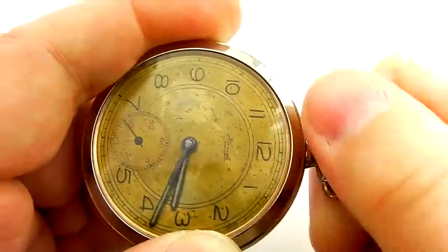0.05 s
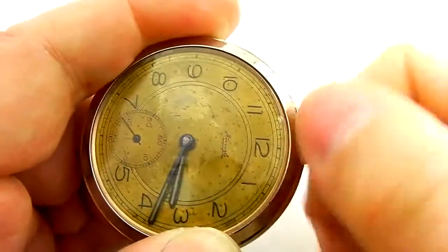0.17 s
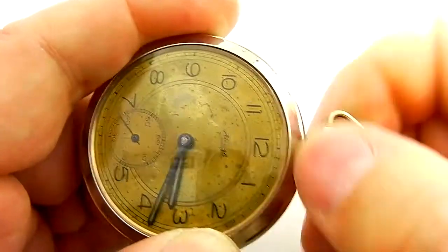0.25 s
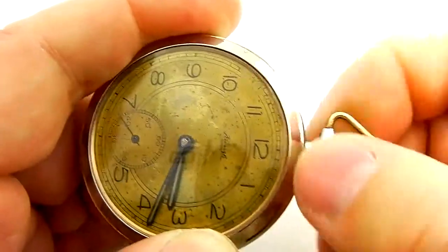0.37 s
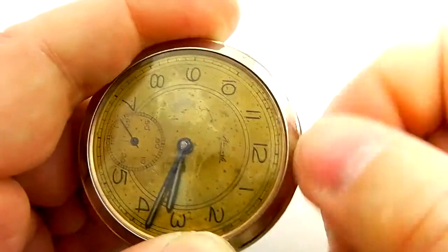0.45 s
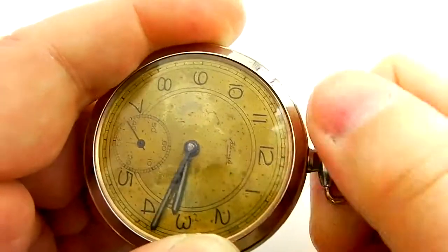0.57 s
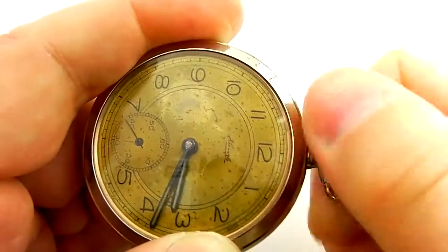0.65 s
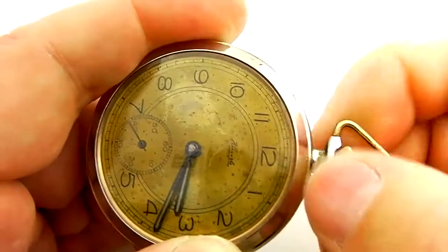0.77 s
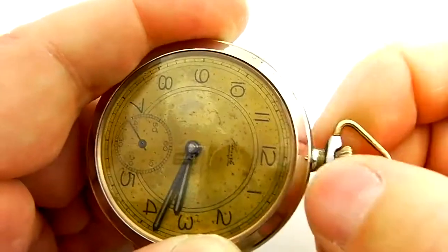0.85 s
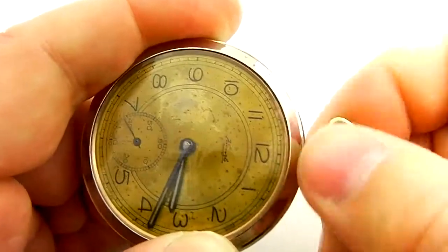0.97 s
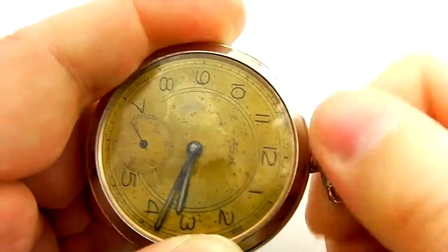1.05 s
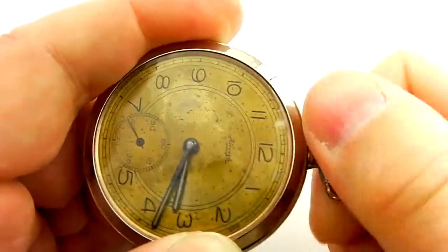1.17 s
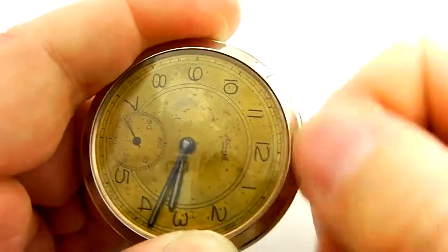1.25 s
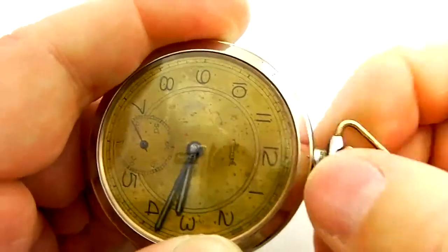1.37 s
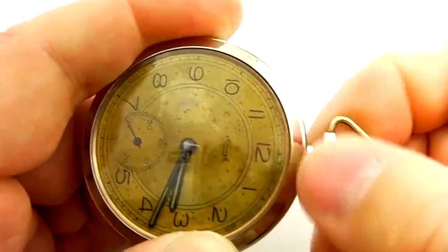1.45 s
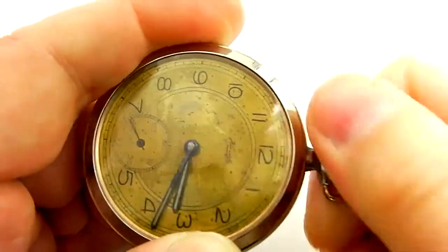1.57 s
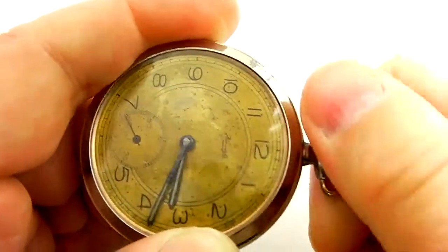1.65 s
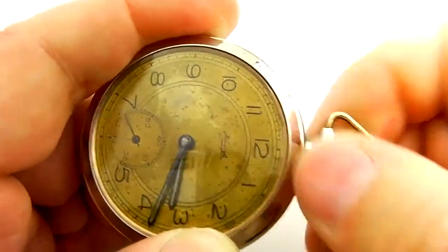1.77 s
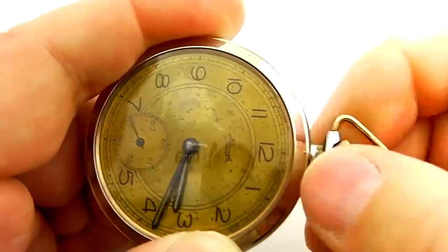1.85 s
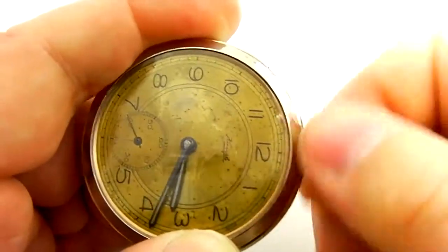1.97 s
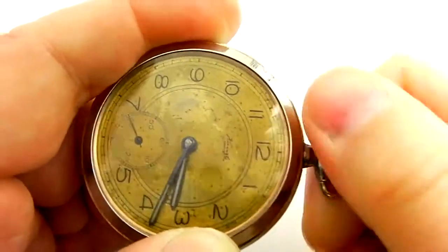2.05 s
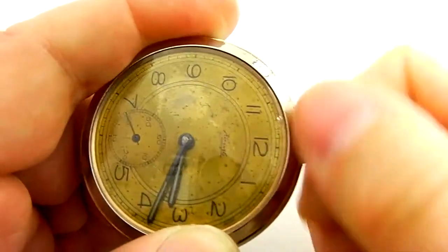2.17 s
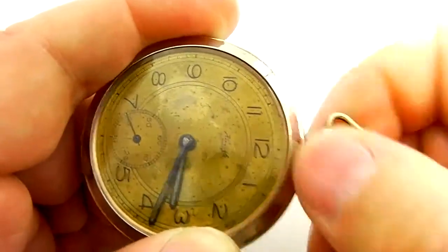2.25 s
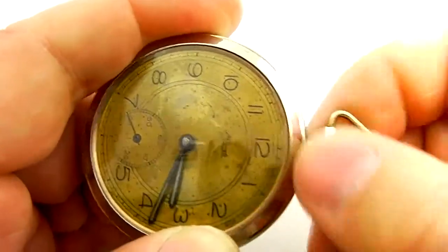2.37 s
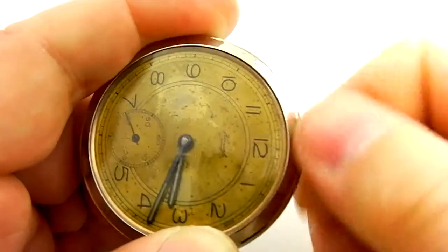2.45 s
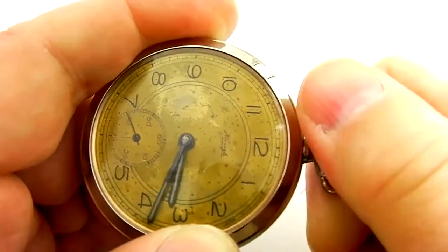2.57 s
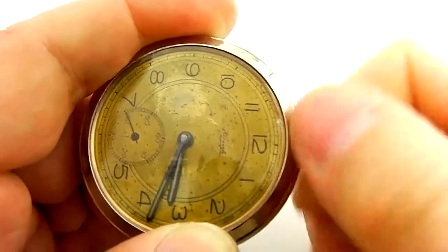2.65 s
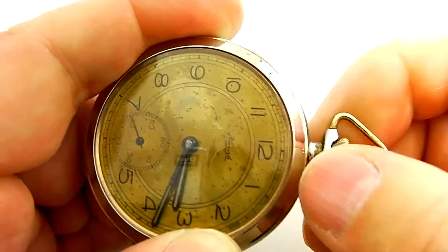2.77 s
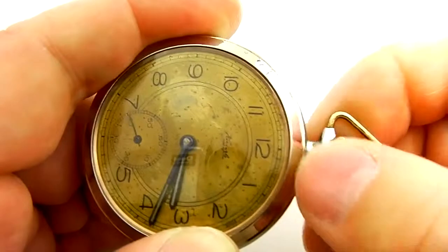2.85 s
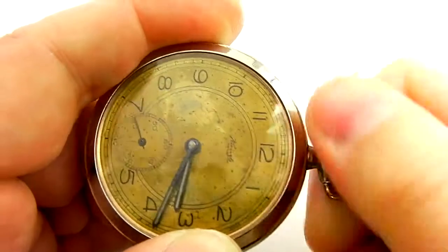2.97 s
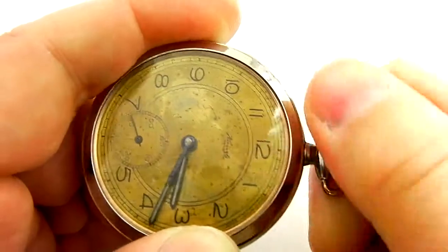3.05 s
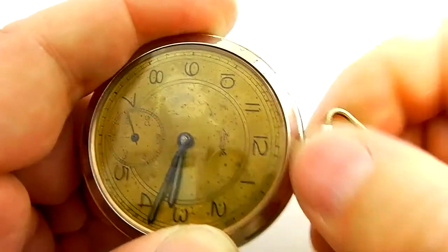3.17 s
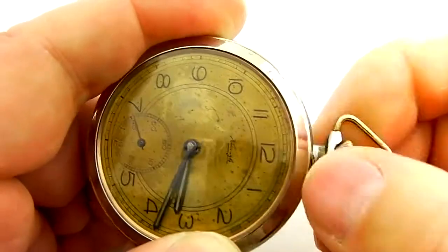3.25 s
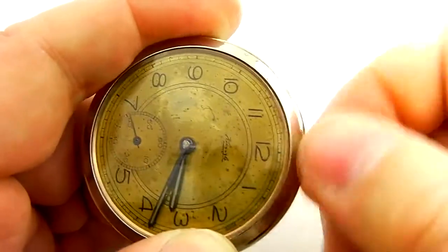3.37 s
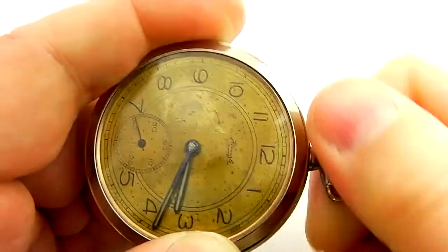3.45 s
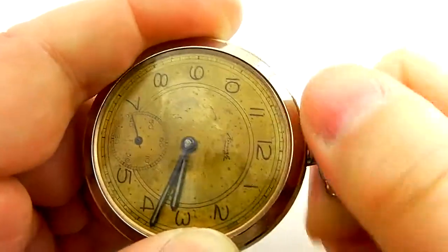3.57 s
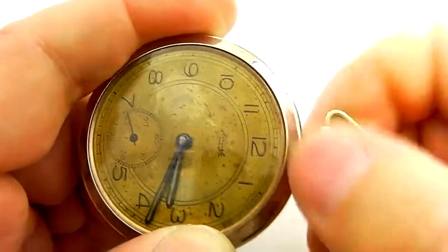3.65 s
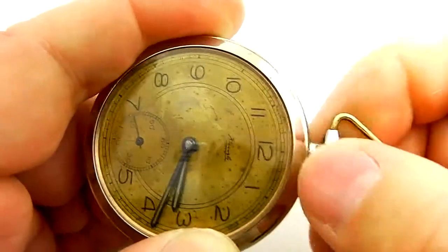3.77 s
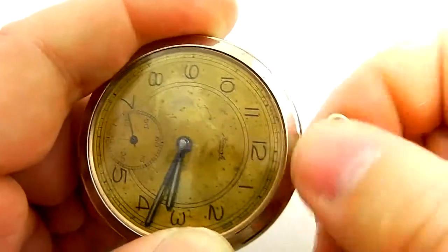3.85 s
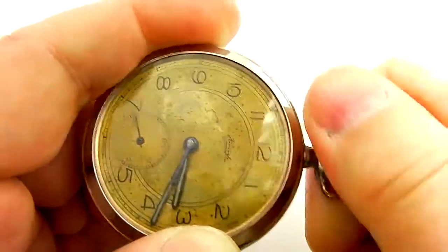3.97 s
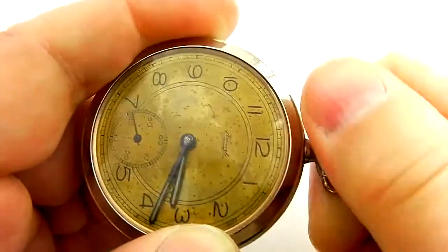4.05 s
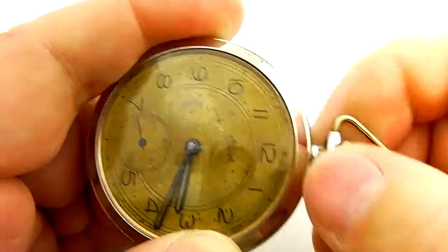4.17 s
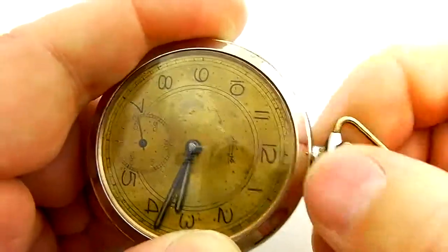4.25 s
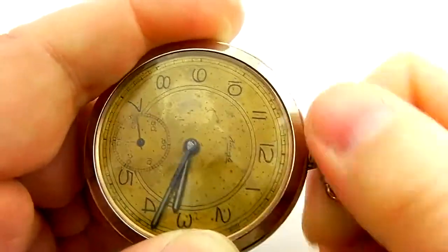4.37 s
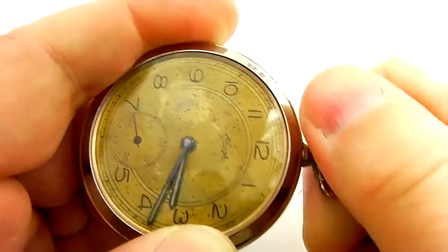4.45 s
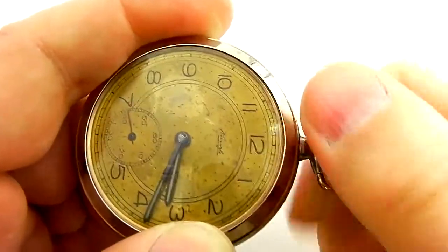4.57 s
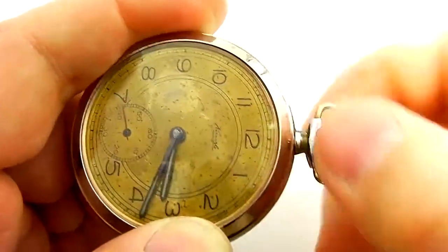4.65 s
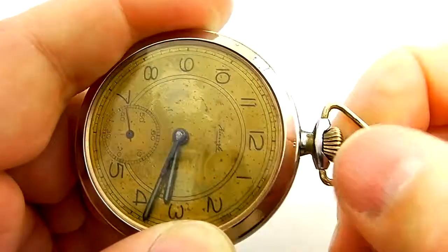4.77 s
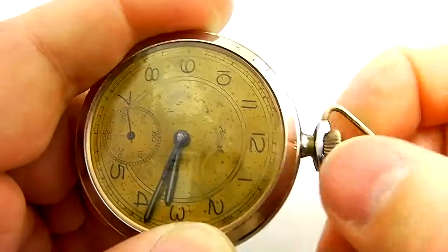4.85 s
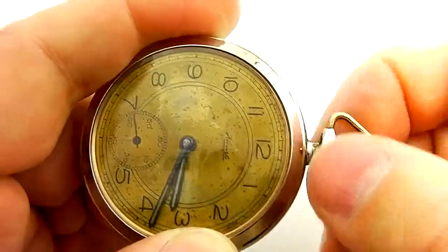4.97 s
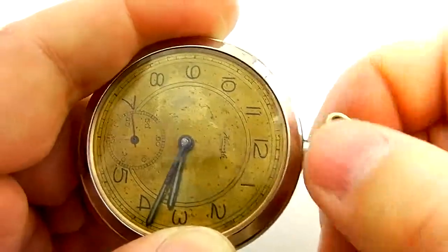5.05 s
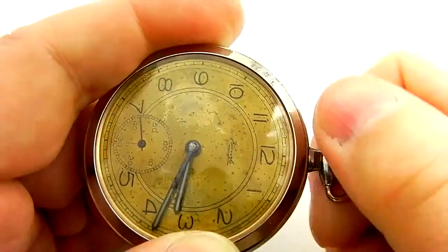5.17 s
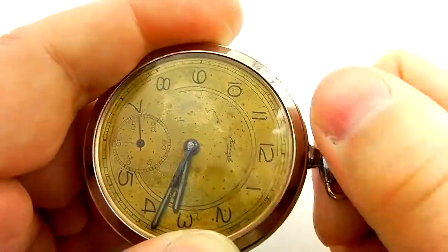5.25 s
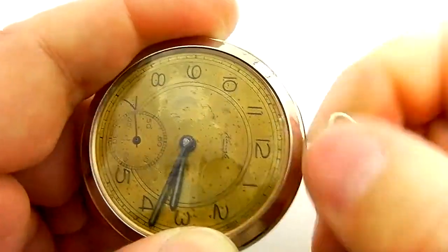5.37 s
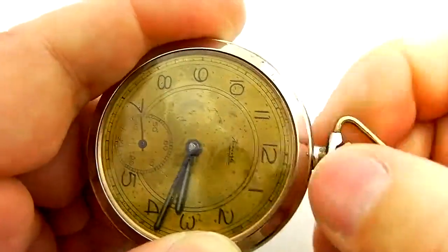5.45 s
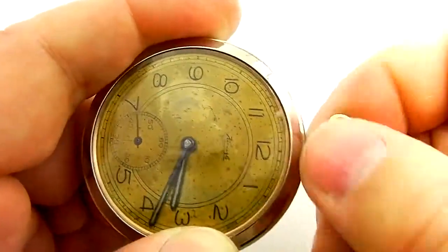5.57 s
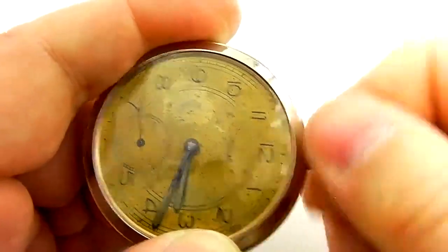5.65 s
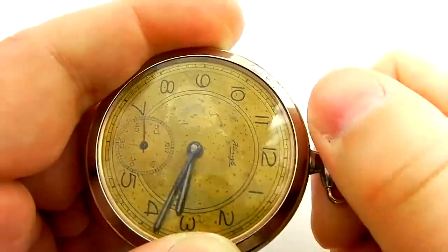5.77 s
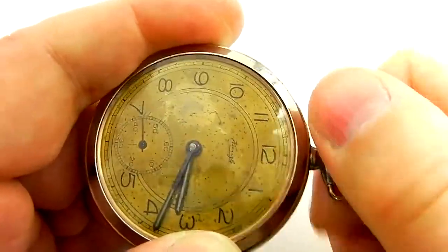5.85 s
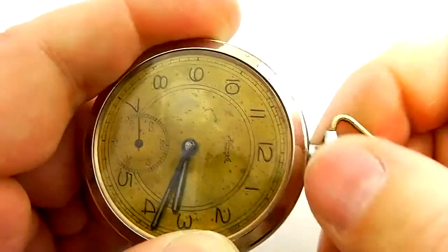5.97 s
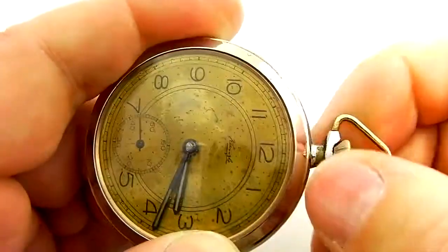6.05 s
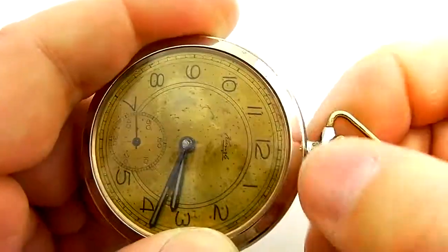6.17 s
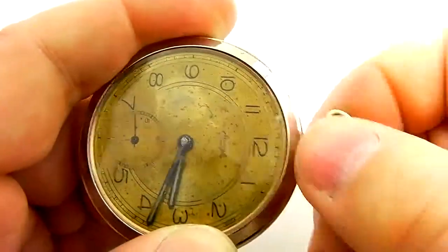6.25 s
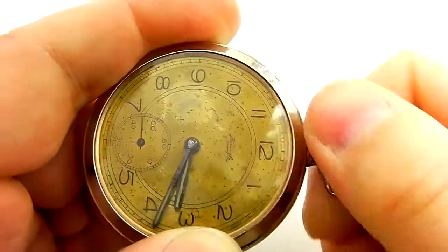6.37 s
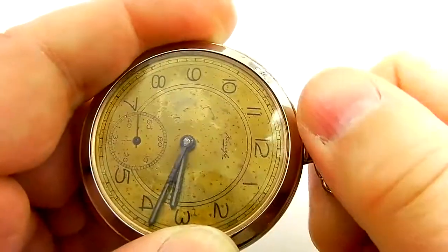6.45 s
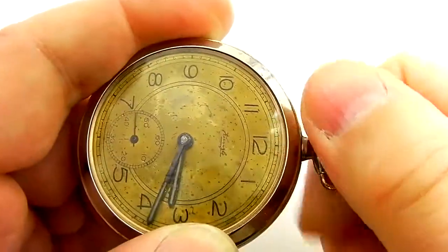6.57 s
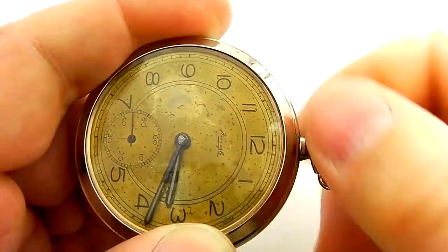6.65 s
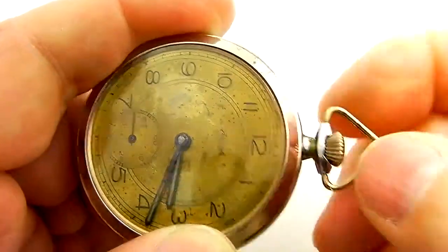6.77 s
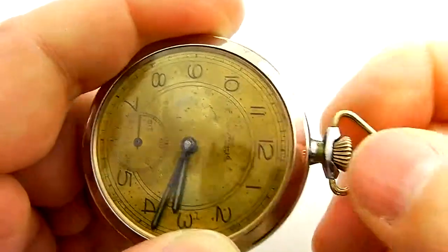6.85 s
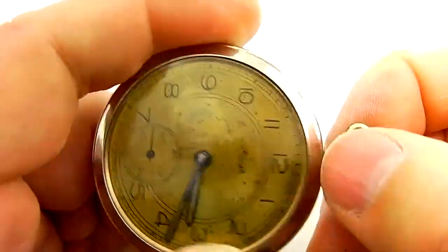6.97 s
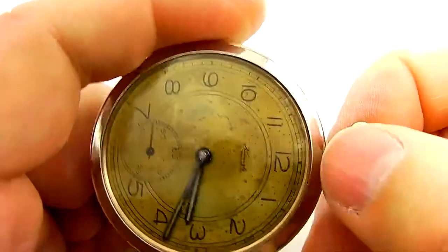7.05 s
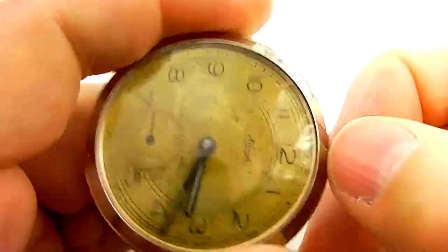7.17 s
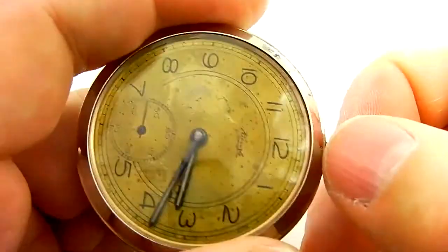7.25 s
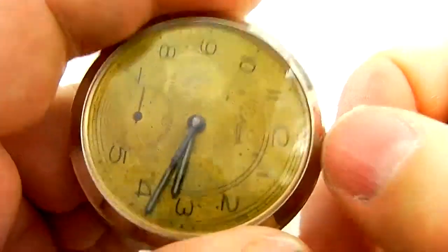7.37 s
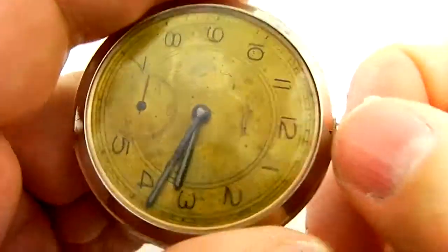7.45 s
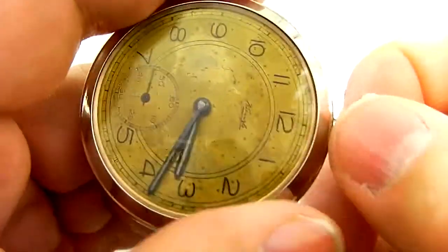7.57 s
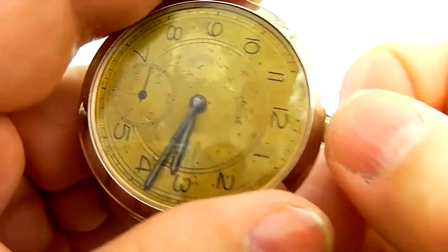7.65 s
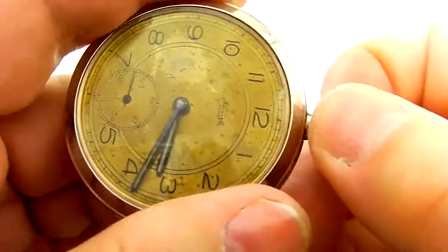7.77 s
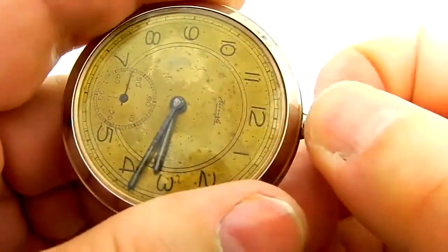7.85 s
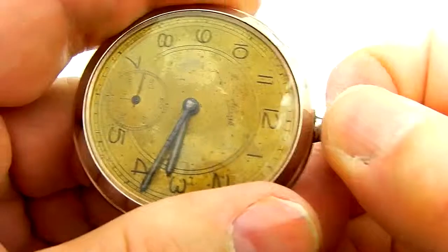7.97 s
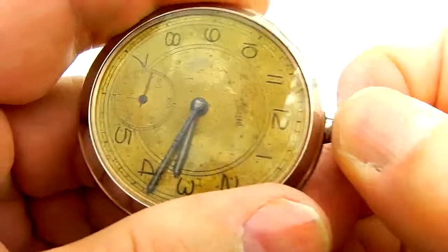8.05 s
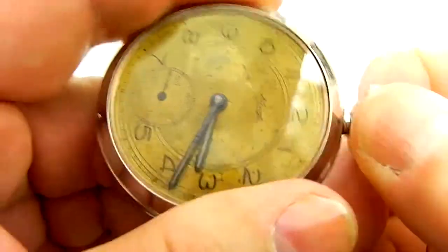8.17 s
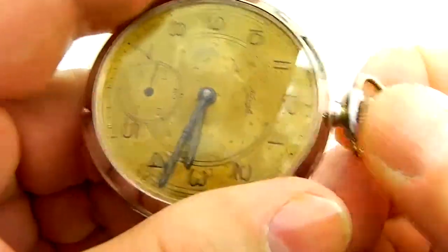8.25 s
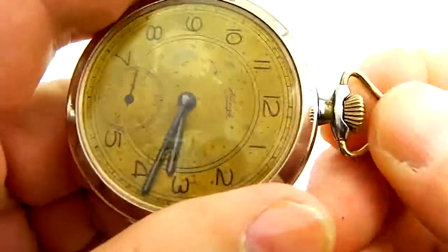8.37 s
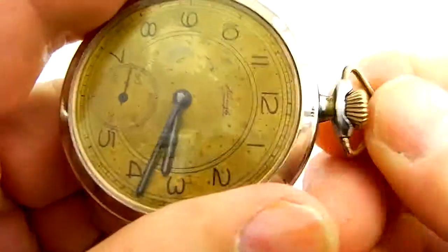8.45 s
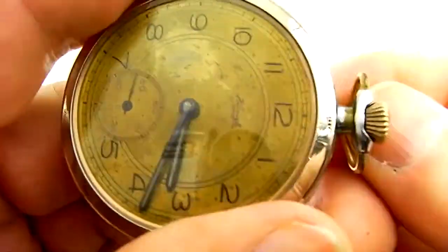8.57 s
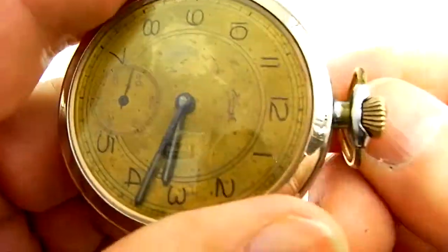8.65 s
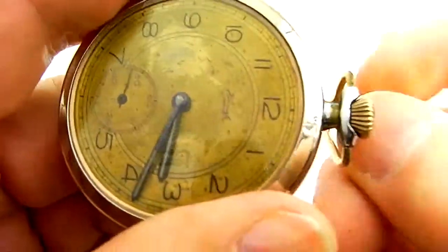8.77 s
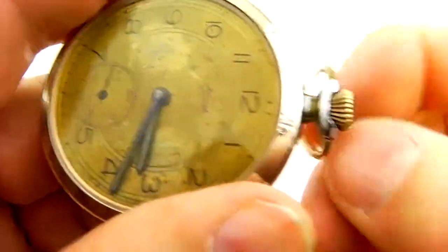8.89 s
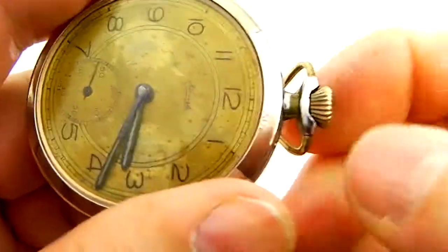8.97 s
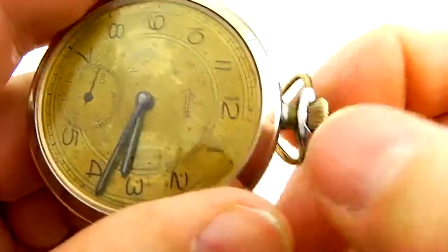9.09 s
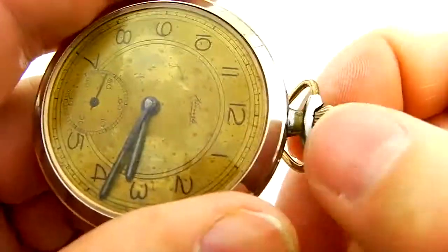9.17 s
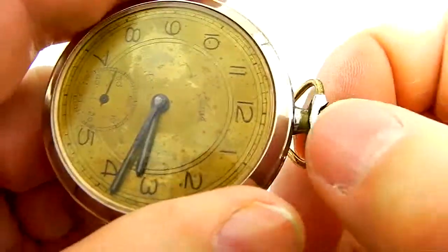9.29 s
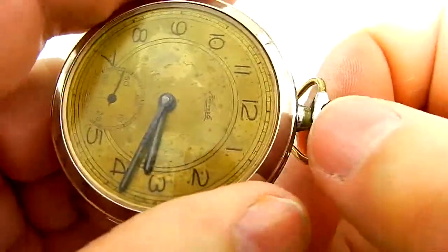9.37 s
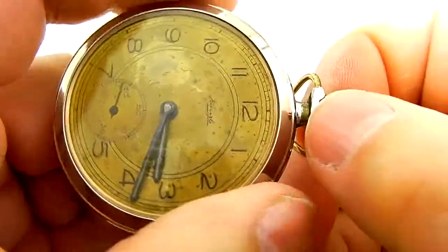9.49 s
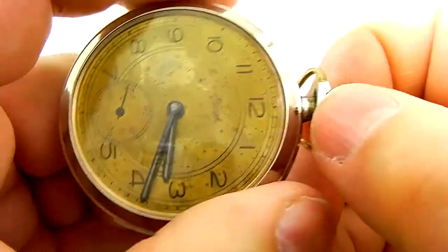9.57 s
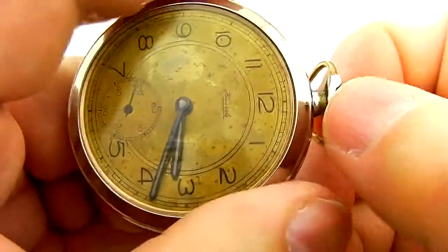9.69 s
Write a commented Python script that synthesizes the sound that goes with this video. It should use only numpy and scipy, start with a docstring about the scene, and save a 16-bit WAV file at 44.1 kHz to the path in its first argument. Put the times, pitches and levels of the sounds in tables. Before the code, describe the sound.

A pocket watch is wound by hand, very close to the microphone in a quiet, nearly dry room. From 0.1 to 4.5 seconds short ratchet bursts come about four a second, each usually three to eight bright, gritty steel clicks packed into under a tenth of a second, forth and back twists differing slightly in colour. Faint skin rubs and light crown knocks fill the gaps. A sharper clack falls at 4.7, then a pause until 5.2; spaced bursts follow until about 6.5. A hard, ringing knock at 6.7 ends the winding. Around 7.1 to 7.3 the hands rumble, bump dully and scuff the rim with a nail. Afterwards there is soft hollow creaking, a small rub and knock near 9, and delicate high ticking, five a second with alternate ticks weaker, present throughout but clearer after 8 as hiss and a thin whine rise.

```python
"""A pocket-watch ratchet: a thumb twists the crown to and fro, close to the microphone in a quiet room.
Each twist drags a spring over a few teeth; every tooth that drops is a noisy contact ringing case and works.
Around the twists the fingers rub and the crown knocks; filtered friction and contact noise make both.
The escapement ticks faintly five times a second, as short bursts through resonances.
Below lie creaking hands made of grains, shaped room noise, a low hum that fades and a thin whine that grows."""
import sys
import numpy as np
from scipy import signal
from scipy.fft import rfft, irfft, next_fast_len
from scipy.io import wavfile

SR = 44100
rng = np.random.default_rng(int(sys.argv[2]) if len(sys.argv) > 2 else 0)


def inscribe(sig):
    """Save sig as 16-bit PCM at rate SR to the path in sys.argv[1].

    A 1-D sig is mono; a 2-D sig holds one channel per row.
    Samples are clipped to [-1, 1] before scaling.
    """
    pcm = np.round(np.clip(np.atleast_2d(sig).T, -1, 1) * 32767)
    wavfile.write(sys.argv[1], SR, pcm.astype(np.int16))


N = 428652
TIME = np.arange(N) / SR


def undb(db):
    """Turn decibels into an amplitude factor."""
    return 10 ** (np.asarray(db) / 20)


def unit(x):
    """Scale to rms 1."""
    return x / np.sqrt(np.mean(x ** 2) + 1e-20)


def add(out, s, sound):
    """Mix a stereo sound in at time s."""
    i = max(int(s * SR), 0)
    out[:, i:i + sound.shape[1]] += sound[:, :max(N - i, 0)]


def curve(points):
    """Draw a breakpoint envelope over the whole scene."""
    return np.interp(TIME, *np.transpose(points))


def walk(rate):
    """Slow random waver with a spread near 1: straight lines between random points, rate per second."""
    count = int(N / SR * rate) + 2
    return np.interp(TIME * rate, np.arange(count), rng.standard_normal(count))


def ports(size, apart):
    """Noise at the two microphone ports: a common part and a part of their own."""
    return (rng.standard_normal(size) + apart * rng.standard_normal((2, size))) / np.hypot(1, apart)


def band(x, lo_hz, hi_hz, order=2):
    """Butterworth band-pass."""
    sos = signal.butter(order, [lo_hz, min(hi_hz, SR / 2 - 100)], "band", fs=SR, output="sos")
    return signal.sosfilt(sos, x)


def ring(x, modes):
    """Pass x through parallel resonances; neighbours swing in opposite senses."""
    size = next_fast_len(x.shape[-1])
    f = np.arange(size // 2 + 1) * SR / size + 1e-6
    hz, width, db = np.transpose(modes)
    weights = undb(db) * (-1) ** np.arange(len(hz))
    response = sum(g / (1 + 1j * (f * f - h * h) / (f * w)) for h, w, g in zip(hz, width, weights))
    return irfft(rfft(x, size) * response, size)[..., :x.shape[-1]]


def click_level(x, db):
    """Give a click the energy of 5 ms at this level."""
    return undb(db) * unit(x) * np.sqrt(.005 * SR / x.shape[-1])


def slips(seconds, taper):
    """Friction force: many tiny slips over a fine hiss, then silence to ring out in."""
    size = max(int(seconds * SR), 100)
    strength = undb(5.75 * np.minimum(rng.exponential(size=size), 4))
    catches = (rng.random(size) < .03) * strength
    force = (catches + 0.26) * ports(size, 0.18) * signal.windows.tukey(size, taper)
    return np.pad(force, ((0, 0), (0, 600)))


def impact(contact_s, rebound_s, rebound_db, chatter_db, chatter_s, size=1536):
    """Force of one steel contact: the blow, a rebound and dying chatter."""
    t = np.arange(size) / SR
    late = t - rebound_s * np.exp(0.14 * rng.standard_normal())
    rebound = undb(rebound_db) * (late > 0) * np.exp(-abs(late) / contact_s)
    chatter = undb(chatter_db) * np.exp(-t / chatter_s)
    onset = 1 - np.exp(-t / 0.000085)
    return (np.exp(-t / contact_s) + rebound + chatter) * onset


# Colour of the room noise. Each row: frequency in Hz, relative density in dB per Hz.
AIR_COLOUR = [(25, -18), (60, -9), (110, -7), (165, -9), (230, -15.5), (310, -14.5), (440, -10.5),
              (620, -13), (1000, -15.5), (1450, -14), (2100, -16), (5000, -15), (8000, -17), (15000, -19)]
# Swell of the room noise, strongest late. Each row: time in seconds, level in dB on top of AIR_DB.
AIR_SWELL = [(0, 1), (4.9, 1.5), (6.8, 2), (7.5, 2), (8, 5), (8.5, 6.5), (9.7, 5.5)]
AIR_DB = -58
# Faint hum and whine. Each row: centre frequency in Hz, mean level in dB at the start, then at the end.
TONES = [(152, -76, -86), (7800, -74.5, -67)]


def background():
    """Even hiss and room rumble from shaped noise, a low hum that fades and a thin whine that grows."""
    hz, db = np.transpose(AIR_COLOUR)
    f = np.arange(N // 2 + 1) * SR / N + 1
    colour = undb(np.interp(np.log(f), np.log(hz), db))
    hiss = unit(irfft(rfft(ports(N, 4.2)) * colour, N))
    out = hiss * undb(AIR_DB + curve(AIR_SWELL) + 0.18 * walk(4.7))
    change = np.interp(TIME, [5.5, 8.5], [0, 1])
    for tone_hz, first_db, last_db in TONES:
        phase = 2 * np.pi * np.cumsum(tone_hz * (1 + 0.00038 * walk(18))) / SR
        level_db = first_db + (last_db - first_db) * change + 0.78 * walk(12.0)
        out = out + unit(np.sin(phase)) * undb(level_db)
    return out


# Soft hollow creaking of the grip. Each row: time in seconds, level in dB before GRIP_DB and the waver.
GRIP_CREAK = [(0.0, -81), (1.41, -77), (1.81, -69), (2.38, -67.5), (2.6, -66.5), (2.84, -71), (3.08, -63),
              (3.57, -78), (4.6, -78), (5.17, -69), (5.79, -78), (6.12, -65), (6.55, -65), (6.82, -57.5),
              (7.52, -69.5), (8.85, -65), (9.39, -67.5), (9.72, -66)]
GRIP_DB, GRIP_WAVER_DB = 1, 3  # the creaking comes and goes with the pressure of the fingers
# Low rumble of the shifting hands. Each row: time in seconds, level in dB.
HAND_RUMBLE = [(0, -76), (6.2, -85), (6.5, -74), (7.15, -65), (7.7, -83), (8.1, -68.5), (9.7, -69)]
# Dull bumps of the hands. Each row: start in seconds, level in dB before BUMP_DB.
HAND_BUMPS = [(4.189, -58), (7.083, -56)]
BUMP_DB = -4.5


def grip():
    """The hands creak in soft hollow grains, rumble as they shift and bump now and then."""
    # about 80 grains a second through two hollow resonances
    grains = (rng.random(N) < 80 / SR) * rng.uniform(0.53, 1, N) * rng.choice([-1, 1], N)
    hollow = ring(grains + 0.031 * ports(N, 4.2), [(391, 74, -0.32), (499, 65, -0.69)])
    creak = band(hollow, 275, 525, order=3)
    out = unit(creak) * undb(curve(GRIP_CREAK) + GRIP_DB + GRIP_WAVER_DB * walk(11))
    rumble = band(ports(N, 0.41), 85, 154, order=3)
    out = out + unit(rumble) * undb(curve(HAND_RUMBLE))
    t = np.arange(SR // 8) / SR
    for s, db in HAND_BUMPS:
        thud = band(ports(len(t), 0.29) * np.exp(-t / .015), 87, 165, order=3)
        add(out, s, undb(db + BUMP_DB) * unit(thud))
    return out


def room(x, t60_s, wet_db, early_s, early_db):
    """Close reflections from hands and table, then a short dim tail."""
    t = np.arange(SR // 3) / SR
    onset = 1 - np.exp(-t / 0.013)
    early = rng.standard_normal((2, len(t))) * onset * np.exp(-t / early_s)
    tail = rng.standard_normal((2, len(t))) * onset * np.exp(-np.log(1000) * t / t60_s)
    response = (undb(early_db) * unit(early) + undb(wet_db) * unit(tail)) / np.sqrt(len(t))
    # the walls return the lower rings more strongly than the treble
    response = response + 2.8 * band(response, 850, 2800, order=1)
    return x + signal.fftconvolve(x, response, axes=1)[:, :N]


# Escapement resonances. Each row: frequency in Hz, width in Hz, relative level in dB.
PALLET = [(4850, 550, -2.5), (6530, 260, 0.5), (6700, 1120, -1), (8800, 440, -29), (9200, 750, -9.5),
          (10830, 300, 0), (11920, 580, 1.5), (14100, 1400, -12)]
# The beat wanders a little and the ticking grows louder late.
# Each row: time in seconds, lateness in seconds, level in dB.
BEAT_WANDER = [(0, -0.0023, -43.5), (2.5, -0.00063, -42.5), (5.7, .014, -39.5), (7.3, .018, -39),
               (8.1, .015, -33.5), (9.7, 0.0052, -33.5)]
FIRST_BEAT_S, BEAT_S, BEATS = .05, .2, 49
TOCK_LATE_S, TOCK_DB = .005, -7  # every second beat is weaker and a little late


def escapement():
    """The pallet strikes the escape wheel and lands on its banking a moment later, tick and tock in turn."""
    out = np.zeros((2, N))
    times, late_s, level_db = np.transpose(BEAT_WANDER)
    for beat in range(BEATS):
        due, tock = FIRST_BEAT_S + beat * BEAT_S, beat % 2
        s = due + np.interp(due, times, late_s) + tock * TOCK_LATE_S
        db = np.interp(due, times, level_db) + tock * TOCK_DB
        force = impact(contact_s=0.0021, rebound_s=0.0042, rebound_db=-13.0, chatter_db=-28, chatter_s=0.0011)
        tick = ring(force * ports(len(force), 0.69), PALLET)
        add(out, s, click_level(band(tick, 4660, 18000), db))
    return out


# Four registers of the watch, low to high: case, plate, wheels, spring; the last three are the works.
# Each row: frequency in Hz, width in Hz, relative level in dB; blows scatter frequency and level.
CASE = [(560, 2700, -20), (1402, 102, 2.5), (1710, 130, -8), (2470, 170, 6.5), (2823, 414, -1.5),
        (2933, 58, -1), (3340, 52, -4.5)]
PLATE = [(4535, 150, 2), (4760, 400, -6), (5250, 450, -9), (5800, 600, -12)]
WHEELS = [(7000, 1280, -4), (7230, 194, 2), (8280, 490, -14), (8870, 240, 0), (9340, 140, 1)]
SPRING = [(11150, 350, -12.5), (11670, 250, 0.5), (12070, 470, -2.5), (12800, 250, -6), (14000, 990, -4.5),
          (14100, 1040, -12.5)]
MODE_SCATTER_DB = 2.2
CRACK_DB = -11  # dry crack of a blow, relative to its ringing


def blow(force, levels_db, lid_db):
    """A gritty contact cracks and rings the four registers; lid_db shifts the low modes of the lid."""
    # short waves reach the two ports less alike
    aparts = (.1, .2, .42, .62)
    lows_hz, highs_hz = (700, 3900, 6100, 10200), (4290, 6300, 11700, 17100)
    out = 0
    for modes, db, apart, lo_hz, hi_hz in zip((CASE, PLATE, WHEELS, SPRING), levels_db, aparts, lows_hz, highs_hz):
        hz, width, mode_db = np.transpose(modes)
        lid = (hz > 1000) & (hz < 1600)
        # the strike point changes each mode's share, the grip its pitch
        mode_db = mode_db + MODE_SCATTER_DB * rng.standard_normal(len(hz)) + lid_db * lid
        hz = hz * (1 + 0.016 * rng.standard_normal(len(hz)))
        push = force * ports(len(force), apart)
        modal = band(ring(push, np.transpose([hz, width, mode_db])), 0.64 * lo_hz, hi_hz)
        # the many small parts answer at once with a dry crack
        crack = band(push, lo_hz, hi_hz, order=3)
        out = out + click_level(unit(modal) + undb(CRACK_DB) * unit(crack), db)
    return out


def rub(seconds, case_db, works_db):
    """Skin catches on the knurling and rings the case and the works."""
    force = slips(seconds, taper=0.25)
    case = ring(force, [(1416, 285, 7.5), (1850, 300, -1.5), (2350, 280, 3), (3900, 1500, 1.5)])
    works = ring(force, PLATE + WHEELS + SPRING) + 0.48 * band(force, 3000, 18000)
    return undb(case_db) * unit(case) + undb(works_db - 2.0) * unit(works)


# Fingers sliding on the knurled crown as they change grip.
# Each row: start in seconds, end in seconds, case level in dB, works level in dB before the 2 dB cut in rub().
RUBS = [(0.648, .698, -78, -56), (2.495, 2.523, -57, -53), (2.654, 2.77, -69, -58), (3.426, 3.48, -61, -56),
        (5.369, 5.45, -58, -49.5), (5.965, 6.037, -60, -53), (6.766, 6.82, -64, -65),
        (7.058, 7.217, -60.5, -55.5), (7.911, 8.142, -61, -68), (8.971, 9.008, -49, -51)]
# One fingernail scuff on the rim: start in seconds, end in seconds, level in dB before SCUFF_DB.
SCUFF = (7.277, 7.302, -41)
SCUFF_DB = -2.5
# Rim resonances of the scuff. Each row: frequency in Hz, width in Hz, relative level in dB.
RIM = [(510, 28, -0.5), (950, 240, -9.5), (1380, 430, -6), (2200, 1300, -8), (3460, 180, 5.5),
       (4320, 890, -3.5)]
GRAB_S = 0.047  # the thumb rubs the crown this long before the first tooth
GRAB_CASE_DB, GRAB_WORKS_DB = -6, -1.5  # added to the push's rub level, ahead of rub()


def fingers():
    """The thumb rubs the crown before each push, the fingers slide to a new grip, and a nail scuffs the rim."""
    out = np.zeros((2, N))
    for start, *_, rub_db in TWISTS:
        add(out, start - GRAB_S, rub(GRAB_S, rub_db + GRAB_CASE_DB, rub_db + GRAB_WORKS_DB))
    for start, end, case_db, works_db in RUBS:
        add(out, start, rub(end - start, case_db, works_db))
    start, end, db = SCUFF
    scuff = band(ring(slips(end - start, taper=0.78), RIM), 400, 5100)
    add(out, start, undb(db + SCUFF_DB) * unit(scuff))
    return out


# Crown and bow knocks, and at 2.0486 s a lone ratchet tooth.
# Each row: start in seconds, case level in dB, works level in dB, brightness in dB (taken from the plate,
# given to the spring); levels come before CROWN_DB.
KNOCKS = [(.5595, -56, -50, 4), (1.5752, -45, -46, -6.5), (2.0486, -46, -28, 1.5), (2.273, -56, -36.5, 6),
          (2.747, -49.5, -43, 1), (3.2337, -55, -44, 3), (3.2515, -55, -44, 4), (3.7177, -47, -41.5, 2),
          (3.9577, -40.5, -39.5, -4), (4.424, -53, -43, 4), (4.6706, -35, -24.5, 3),
          (6.6798, -28.5, -25, 2), (7.029, -60, -51.5, 4.5), (8.33, -58, -49.5, 0), (8.962, -51, -46, -2),
          (8.992, -47, -61, -5)]
CROWN_DB = 0.5


def crown():
    """Looser, longer contacts of crown and bow, plus one lone tooth; a harder knock rings the lid more."""
    out = np.zeros((2, N))
    for s, case_db, works_db, bright_db in KNOCKS:
        force = impact(contact_s=0.00051, rebound_s=0.00078, rebound_db=-16.0, chatter_db=-9, chatter_s=0.0026)
        lid_db = np.interp(case_db, [-50, -35, -27], [3, 5, 10])
        levels_db = [case_db, works_db - bright_db, works_db, works_db + bright_db]
        add(out, s, blow(force, levels_db, lid_db))
    return out * undb(CROWN_DB)


BRAKE_TEETH = .8  # the braking is felt over this many teeth


def tooth_times(start, length, teeth, slowing, braking):
    """When the teeth of one push drop: the gaps change by a steady ratio, then stretch as the thumb stops."""
    count = int(round(teeth)) - 1
    to_go = np.arange(count)[::-1]
    gaps = slowing ** np.linspace(0, 1, count) * (1 + braking * np.exp(-to_go / BRAKE_TEETH))
    return start + length * np.append(0, np.cumsum(gaps)) / (gaps.sum() + 1e-12)


# Pushes of the thumb on the crown, a twist that stalls taking two.
# Each row: first tooth in seconds, length in seconds, number of teeth, way (0 forth, 1 back),
# slowing as last gap over first before braking, braking as added stretch of the final gap,
# case level in dB, plate level in dB, works level in dB, thumb rub in dB before the grab offsets.
TWISTS = [(0.111, 0.0368, 4, 0, 1.22, 1.0, -39.0, -28.0, -21.0, -50.5),
          (0.3041, 0.0292, 4, 1, 0.79, 0.6, -40.5, -35.0, -21.5, -49),
          (0.3517, 0.0527, 4, 1, 0.64, 3.3, -39.5, -30.0, -23.5, -52),
          (0.5744, 0.0637, 6, 0, 1.68, 1.0, -40.5, -30.5, -23.0, -57),
          (0.8174, 0.0272, 3, 1, 0.95, 0.4, -43.0, -33.0, -22.5, -51),
          (0.8566, 0.0645, 5, 1, 3.46, 0.1, -38.0, -36.0, -23.5, -52),
          (1.1245, 0.0792, 7, 0, 0.5, 8.9, -39.5, -31.0, -22.0, -53),
          (1.3619, 0.0369, 5, 1, 0.29, 2.6, -40.5, -33.0, -21.5, -50),
          (1.4374, 0.0, 1, 1, 1, 0, -38.5, -36.5, -22.0, -52),
          (1.6318, 0.0719, 6, 0, 2.09, 0.7, -36.5, -29.0, -21.0, -58),
          (1.8503, 0.068, 7, 1, 0.2, 8.3, -40.5, -32.5, -21.5, -50),
          (2.0982, 0.054, 6, 0, 1.22, 0.9, -36.0, -29.0, -21.0, -60),
          (2.3254, 0.0269, 4, 1, 0.2, 2.4, -38.5, -31.5, -21.5, -49),
          (2.3793, 0.0329, 2, 1, 1, 0, -35.5, -32.5, -21.5, -52),
          (2.5624, 0.0512, 5, 0, 1.94, 0.2, -37.5, -29.5, -18.5, -55),
          (2.7854, 0.0887, 7, 1, 3.46, 0.5, -35.0, -30.5, -22.5, -56),
          (3.0366, 0.0611, 6, 0, 1.31, 0.6, -40.5, -28.5, -20.5, -53),
          (3.2586, 0.0787, 8, 1, 2.69, 0.6, -36.5, -31.0, -22.5, -49),
          (3.5033, 0.0885, 7, 0, 1.51, 1.3, -40.0, -26.5, -20.0, -62),
          (3.7352, 0.0512, 7, 1, 0.69, 3.2, -37.0, -31.0, -21.5, -47),
          (3.9984, 0.0694, 6, 0, 3.1, 0.2, -41.0, -29.0, -19.5, -52),
          (4.2224, 0.054, 6, 1, 0.71, 2.4, -37.5, -29.5, -22.5, -46),
          (4.4626, 0.0686, 6, 0, 4.95, 0.0, -42.0, -27.0, -19.5, -55),
          (5.1936, 0.0648, 6, 0, 1.13, 1.6, -39.5, -31.0, -20.0, -50.5),
          (5.4631, 0.082, 7, 1, 0.88, 1.3, -38.0, -32.0, -22.0, -56),
          (5.7529, 0.067, 6, 0, 0.91, 2.4, -37.0, -28.0, -20.0, -53),
          (6.1271, 0.0346, 2, 1, 0.98, 0.0, -36.5, -31.0, -20.0, -63),
          (6.4281, 0.0357, 4, 0, 1.18, 0.0, -38.0, -29.0, -21.5, -58),
          (6.4903, 0.0508, 2, 0, 1, 0, -37.5, -31.0, -20.5, -52)]
# Tooth colour, first row at the start of a push and second at its end. Each row: case, plate, wheels
# and spring in dB, added to the push's case and plate levels and, for the last two, its works level.
FORTH = [(-2, 1, -7, 1), (-2.5, -1, -8, 0)]
BACK = [(-1.9, -2.5, -4, -0.5), (0.28, -0.13, -4, -3.5)]
TOOTH_SCATTER_DB = 0.87  # no two teeth drop alike


def teeth():
    """Every tooth as (s, levels of the four registers); the colour follows the way and shifts along the push."""
    for start, length, count, way, slowing, braking, case_db, plate_db, works_db, _ in TWISTS:
        times = tooth_times(start, length, count, slowing, braking)
        first, last = BACK if way else FORTH
        scatter = TOOTH_SCATTER_DB * rng.standard_normal((len(times), 4))
        colours = np.linspace(first, last, len(times)) + scatter
        yield from zip(times, colours + [case_db, plate_db, works_db, works_db])


SCRAPE_DB, SCRAPE_S = -37, 0.0025  # a faint scrape between the teeth of a push; time constant of its envelope
SLIDE_DB = -14  # constant part of the scrape for a 4 ms gap, relative to the enveloped part's peak


def ratchet():
    """A faint scrape between the teeth of a push; the spring snaps down behind each tooth and bounces once."""
    out, previous_s = np.zeros((2, N)), 0
    modes = CASE + PLATE + WHEELS + SPRING
    for s, levels_db in teeth():
        gap, previous_s = s - previous_s, s
        force = impact(contact_s=.0004, rebound_s=.0013, rebound_db=-15, chatter_db=-21, chatter_s=.002)
        add(out, s, blow(force, levels_db, lid_db=-1.5))
        # after a long gap, the scrape keeps to a short stretch
        scrape_s = max(gap, .004) if gap < .06 else .011
        friction = slips(scrape_s, taper=0.11)
        # the constant part is louder in shorter gaps
        to_click_s = np.maximum(scrape_s - np.arange(friction.shape[1]) / SR, 0)
        envelope = np.exp(-to_click_s / SCRAPE_S) + undb(SLIDE_DB) * 0.004 / scrape_s
        even_level = np.std(ring(friction, modes)[:, :int(scrape_s * SR)])
        scrape = ring(friction * envelope, modes) / even_level
        add(out, s - scrape_s, undb(SCRAPE_DB) * scrape)
    return out


def scene():
    """The watch in its room, over the hands and the room noise."""
    watch = ratchet() + crown() + escapement() + fingers()
    return room(watch, t60_s=0.37, wet_db=-36.0, early_s=0.0044, early_db=-21) + grip() + background()


TOP_HZ = 15450


def record(dry):
    """The right port hears everything a few microseconds earlier; the top is cut steeply."""
    lag = .25  # samples
    delay = np.exp(-2j * np.pi * lag * np.arange(N // 2 + 1) / N)
    left = irfft(rfft(dry[0]) * delay, N)
    low_pass = signal.ellip(8, .2, 70, TOP_HZ, fs=SR, output="sos")
    return signal.sosfilt(low_pass, np.array([left, dry[1]]))


dry = scene()
out = record(dry)
inscribe(out)
```